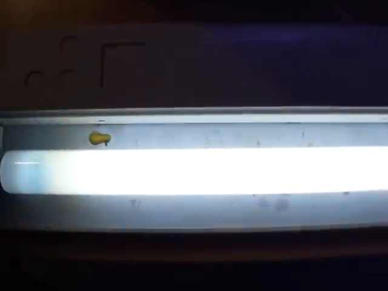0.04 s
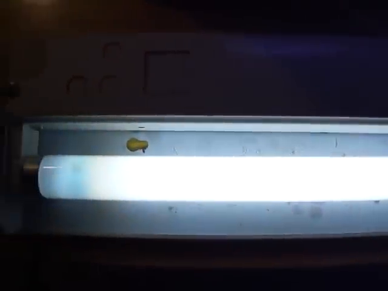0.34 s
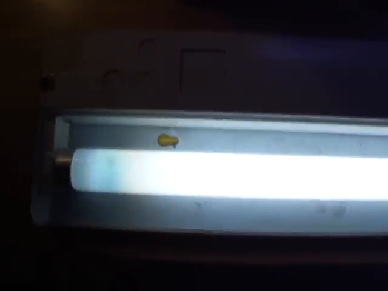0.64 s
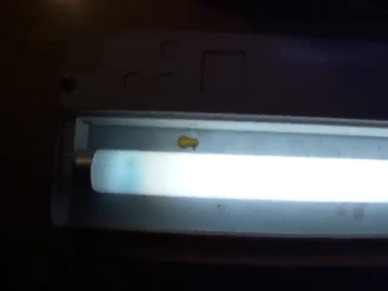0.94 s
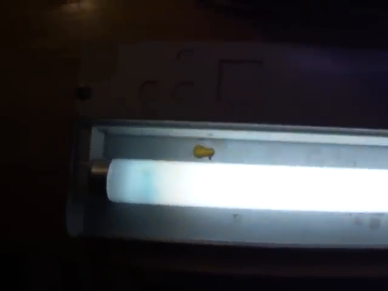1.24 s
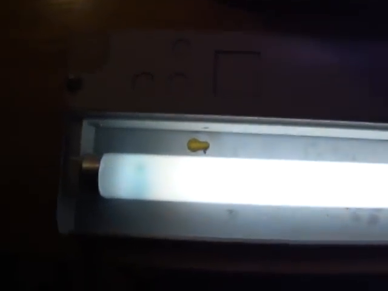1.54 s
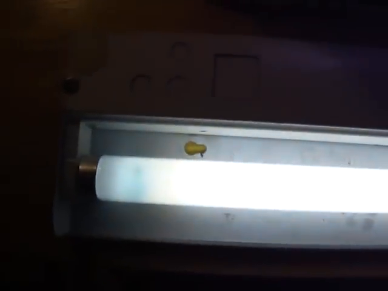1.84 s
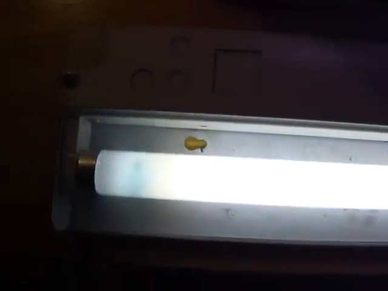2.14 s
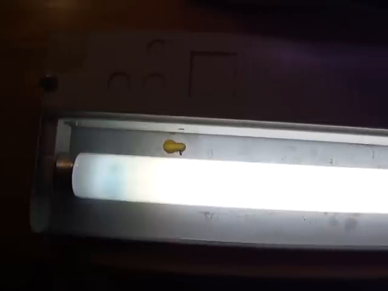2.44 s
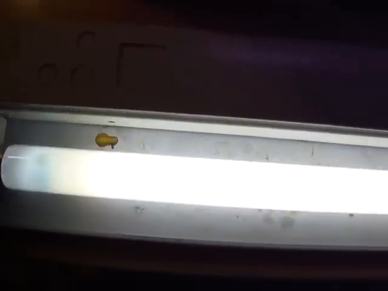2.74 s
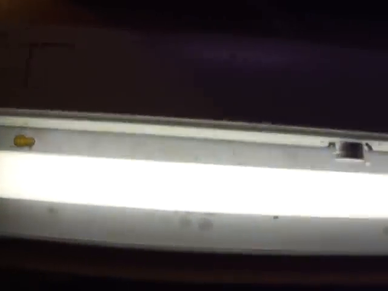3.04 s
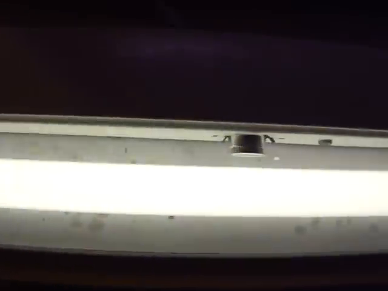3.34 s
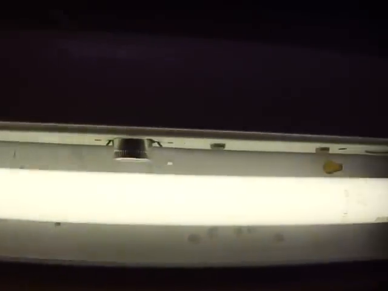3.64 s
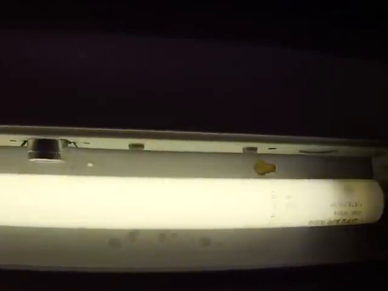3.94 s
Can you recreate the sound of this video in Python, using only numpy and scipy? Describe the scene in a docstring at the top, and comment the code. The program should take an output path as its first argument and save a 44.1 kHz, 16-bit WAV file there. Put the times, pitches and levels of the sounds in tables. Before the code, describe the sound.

A fluorescent tube buzzes and hums steadily up close, with a thin high whine.

```python
"""A fluorescent tube hums and buzzes on 60 Hz mains, close to a hand-held microphone in a quiet room.
The ballast hums and, each mains cycle, shakes the fixture into the same bursts of whine, whistle
and sizzle. The microphone moves to one end, rests, then slides along the tube, so the fixture's
rings fade and swell in turn."""
import sys
import numpy as np
from scipy import signal
from scipy.fft import rfft, irfft
from scipy.io import wavfile

SR = 44100
rng = np.random.default_rng(int(sys.argv[2]) if len(sys.argv) > 2 else 0)


def generate_wav(signal):
    """Clip the signal to [-1, 1] and save it as 16-bit WAV at the path in sys.argv[1]."""
    frames = np.transpose(np.atleast_2d(signal))
    scaled = np.clip(frames, -1, 1) * 32767
    pcm = np.round(scaled).astype(np.int16)
    wavfile.write(sys.argv[1], SR, pcm)


N = 176400
MAINS_HZ, CYCLE_SIZE = 60, 4096
HARMONIC_HZ = np.arange(CYCLE_SIZE) * MAINS_HZ
CYCLE_TURNS = np.arange(CYCLE_SIZE) / CYCLE_SIZE
BIN_HZ = np.fft.rfftfreq(N, 1 / SR)

# mains drift (time [s], frequency [Hz])
MAINS_TRACK_HZ = [(0, 59.98), (.8, 59.98), (2.2, 59.991), (3, 60.006), (4, 59.991)]
# microphone path (time [s], slide [0 = tube end, 1 = further along])
MIC_SLIDE = [(0, 0.36), (.6, 0), (2.6, 0), (3.2, 0.39), (3.65, 0.67), (4, 0.72)]
# room noise (frequency [Hz], density [dB/Hz])
ROOM_SPECTRUM = [(20, -110), (50, -106), (80, -99), (110, -100), (150, -95), (210, -91), (300, -86.5),
                 (450, -86.5), (550, -81), (630, -85), (690, -80.5), (790, -85.5), (870, -80), (980, -84),
                 (1100, -82), (1170, -84), (1320, -84), (1450, -84.5), (1650, -88.5), (2500, -88.5),
                 (3000, -93.5), (3900, -98), (4300, -93), (5000, -99.5), (7000, -100), (9000, -101.5),
                 (10900, -100)]
# change in room noise at slide 1 (frequency [Hz], gain [dB])
ROOM_ALONG_EQ = [(100, -2), (550, 3.5), (900, -4.5), (1300, -4.5), (2000, -1), (3300, -3.5), (10000, 7)]
# ballast hum at slide 0 and 1 (harmonic [x mains], relative level [dB])
HUM_END_HARMONICS = [(1, -26), (2, -18), (3, -10.5), (4, -12), (5, -10), (6, -5.5), (7, -13.5), (8, -3.5),
                     (9, -14.5), (10, -10), (11, -19.5), (12, -18), (13, -22.5), (14, -18), (15, -12),
                     (16, -7.5), (17, -10.5), (18, -5), (19, -5), (20, 1), (21, -24), (22, -16.5),
                     (23, -9.5), (24, -17)]
HUM_ALONG_HARMONICS = [(1, -21.5), (2, -28), (3, -21), (4, -3.5), (5, -14), (6, -5), (7, 2.5), (8, -2.5),
                       (9, -14), (10, -1), (11, -7), (12, -16), (13, -11), (14, -5), (15, -12), (16, -25),
                       (17, -9), (18, -5), (19, 3), (20, 1), (21, -26), (22, -18), (23, -18), (24, -6)]
# partials of the fixture's rings (frequency [Hz], relative level [dB])
RATTLE_PARTIALS = [(2880, -22), (3120, -8.5), (3240, -19), (3360, -3.5), (3420, -22), (3480, -9),
                   (3540, -18), (3600, -8.5), (3660, -12), (3720, -10), (3780, -3), (3840, -10), (3900, -6),
                   (3960, -5), (4020, -11.5)]
FIZZ_PARTIALS = [(4900, -15.5), (5400, -13), (6360, -14.5), (6480, -4), (6600, -15), (7080, -14),
                 (7200, -1), (7320, -19.5), (7440, 6.5), (7560, -7.5), (7680, 0.5), (7800, -4), (7920, -6),
                 (8160, -10.5)]
SIZZLE_PARTIALS = [(9060, -10), (9120, -16), (9180, -10), (9240, -3), (9300, 1.5), (9360, -11.5),
                   (9420, 1.5), (9480, -2), (9540, -4.5), (9600, -11), (9660, -19.5)]
SPIT_PARTIALS = [(9720, -13), (9840, -12), (9960, -6.5), (10200, -0.5), (10320, -27), (10440, -9),
                 (10500, -10), (10560, -0.5), (10680, -17), (10800, 3.5), (10860, -2.5), (10980, -3.5)]
WHISTLE_END_PARTIALS = [(8160, -25), (8280, -13), (8400, -0.5), (8460, -6.5), (8520, -2), (8580, 0),
                        (8640, 1), (8700, -6), (8760, -12), (8880, -25), (8940, -24)]
WHISTLE_ALONG_PARTIALS = [(8160, -26), (8340, -24), (8460, -9), (8520, -15.5), (8580, 0), (8640, -3),
                          (8700, -3), (8760, -11), (8820, -14), (8880, -10), (8940, -13)]
WHINE_PARTIALS = [(4080, -63.5), (4140, -58), (4200, -68), (4260, -53), (4320, -58.5), (4380, -55),
                  (4440, -59.5), (4500, -63.5), (4560, -87), (4620, -62), (4680, -63.5), (4740, -65),
                  (4800, -64.5), (4860, -81.5)]
# bursts in one mains cycle (centre [cycles], width [cycles], relative level [dB])
HUM_BURSTS = [(0.082, 0.128, 2), (0.359, 0.101, -1), (0.748, 0.182, -1)]
RATTLE_BURSTS = [(0.219, 0.147, -2), (0.742, 0.15, 0)]
FIZZ_BURSTS = [(.26, 0.2, 0.081), (0.742, 0.17, -1.09)]
SIZZLE_BURSTS = [(0.36, 0.055, -2), (0.14, 0.15, 1), (0.73, 0.14, -6.5)]
WHISTLE_BURSTS = [(.13, 0.087, -12.5), (.64, .13, -1.5)]
WHINE_BURSTS = [(.14, 0.085, 0), (.31, 0.075, -6), (0.599, 0.133, -0.5), (.88, 0.095, -8.5)]
# rings at the microphone, before any trim (time [s], level [dB])
RATTLE_DB = [(0, -62.5), (2.7, -62), (3.15, -58.5), (3.4, -59), (3.7, -56), (4, -55)]
FIZZ_DB = [(0, -62.5), (.7, -62.5), (2.2, -61), (2.85, -64), (3.2, -61.5), (3.7, -61), (4, -64)]
SIZZLE_DB = [(0.0, -56), (0.7, -63), (1.73, -56), (2.38, -57), (2.74, -65), (2.92, -54.5), (3.07, -56),
             (3.24, -64), (3.59, -62), (3.68, -74), (3.91, -63), (4.0, -65)]
SPIT_DB = [(0, -58.5), (.37, -57.5), (2, -56), (2.7, -56), (3.05, -58.5), (3.2, -56.5), (3.34, -63),
           (3.55, -60.5), (3.68, -60), (3.85, -55), (4, -57)]
WHISTLE_DB = [(0, -54.5), (.23, -56), (.47, -63), (.71, -55), (1.3, -57), (2.12, -59), (2.66, -54),
              (2.84, -61), (3.03, -51.5), (3.17, -59.5), (3.31, -50.5), (3.42, -52), (3.56, -46),
              (3.87, -43.5), (4, -43.7)]
WHINE_LOW_DB = [(0.0, -51), (0.7, -51.5), (1.97, -50.5), (2.6, -51.5), (3.13, -52), (3.74, -53), (4.0, -55)]
WHINE_MID_DB = [(0.0, -48), (0.38, -49), (0.75, -52), (2.41, -54), (3.14, -46.5), (3.62, -49.5),
                (3.91, -58.5), (4.0, -65)]
WHINE_TOP_DB = [(0.0, -67), (0.79, -61), (2.61, -60), (3.03, -65.5), (3.66, -58), (4.0, -56)]


def amp(db):
    """dB to gain."""
    return 10 ** (np.asarray(db) / 20)


def unit_rms(x):
    """Scale to rms 1."""
    return x / np.sqrt(np.mean(abs(x) ** 2) + 1e-20)


def curve(points):
    """(time [s], value) points to one value per sample."""
    return np.interp(np.arange(N) / SR, *np.transpose(points))


def gain_at(spectrum, freq):
    """Gain from (frequency, level [dB]) points, log frequency axis."""
    point_freq, db = np.transpose(sorted(spectrum))
    return amp(np.interp(np.log(freq + 1), np.log(point_freq + 1), db))


def equalise(x, spectrum):
    """Filter by (frequency [Hz], gain [dB]) points."""
    return irfft(rfft(x) * gain_at(spectrum, BIN_HZ), N)


def drift(rate_hz):
    """Low-passed noise, rms 1."""
    return unit_rms(irfft(rfft(rng.standard_normal(N)) * np.exp(-(BIN_HZ / rate_hz) ** 2), N))


def burst_envelope(bursts, turns):
    """Shaking strength over the mains cycle: Gaussian bursts."""
    return sum(amp(db) * np.exp(-(((turns - centre + .5) % 1 - .5) / width) ** 2)
               for centre, width, db in bursts)


def burst_partials(spectrum, bursts, passes=40):
    """Mains harmonics; each pass draws their random phases toward the bursts."""
    edges_hz = np.transpose(spectrum)[0]
    low_hz, high_hz = edges_hz.min() - MAINS_HZ / 2, edges_hz.max() + MAINS_HZ / 2
    gains = gain_at(spectrum, HARMONIC_HZ) * (HARMONIC_HZ > low_hz) * (HARMONIC_HZ < high_hz)
    envelope = burst_envelope(bursts, CYCLE_TURNS)
    partials = gains * np.exp(2j * np.pi * rng.random(CYCLE_SIZE))
    for _ in range(passes):
        bunched = np.fft.fft(envelope * np.exp(1j * np.angle(np.fft.ifft(partials))))
        partials = gains * np.exp(1j * np.angle(bunched))
    return partials


def with_gains(partials, gains):
    """Same phases, new magnitudes."""
    return partials / (abs(partials) + 1e-12) * gains


def loop_cycle(partials, turns):
    """One cycle looped on the mains clock; complex, real part rms 1."""
    looped = np.interp(turns % 1, CYCLE_TURNS, np.fft.ifft(partials), period=1)
    return unit_rms(looped) * np.sqrt(2)


def room(slide, flutter_db=0.75):
    """Airy room noise; its colour shifts as the microphone moves."""
    air = equalise(rng.standard_normal(N) * np.sqrt(SR / 2), ROOM_SPECTRUM)
    blend = (1 - slide) * air + slide * equalise(air, ROOM_ALONG_EQ)
    return blend * amp(flutter_db * drift(rate_hz=18))


def ballast_hum(turns, slide, split_hz=750, end_db=-51, along_db=-49):
    """Smooth low hum plus pulsing nasal buzz; the balance changes along the tube."""
    lines = [(k * MAINS_HZ, db) for k, db in HUM_END_HARMONICS]
    smooth = burst_partials([(hz, db) for hz, db in lines if hz < split_hz], [(0, 10, 0)])  # flat
    pulsing = burst_partials([(hz, db) for hz, db in lines if hz > split_hz], HUM_BURSTS)
    end = smooth + pulsing
    along = with_gains(end, gain_at(HUM_ALONG_HARMONICS, np.arange(CYCLE_SIZE)))
    return ((1 - slide) * amp(end_db) * loop_cycle(end, turns).real
            + slide * amp(along_db) * loop_cycle(along, turns).real)


def fixture_ring(spectrum, bursts, turns, slide, hiss_gain, echo_db=3.5, echo_turns_per_slide=1.1):
    """Bursts, pulsed hiss and a housing reflection that grows and turns in phase with slide."""
    partials = burst_partials(spectrum, bursts)
    smeared = loop_cycle(burst_partials(spectrum, bursts, passes=1), turns)
    echo = amp(echo_db) * slide * smeared * np.exp(2j * np.pi * echo_turns_per_slide * slide)
    band = np.interp(BIN_HZ, HARMONIC_HZ, abs(partials))
    pulsed_noise = rng.standard_normal(N) * burst_envelope(bursts, turns)
    hiss = unit_rms(irfft(rfft(pulsed_noise) * band, N))
    return unit_rms((loop_cycle(partials, turns) + echo).real + hiss_gain * hiss)


def fixture_buzz(turns, slide, sizzle_trim_db=-0.1, spit_trim_db=-0.14):
    """Four rough rings, from a rattle near 3.8 kHz to a thin spit above 10 kHz."""
    rattle = fixture_ring(RATTLE_PARTIALS, RATTLE_BURSTS, turns, slide, hiss_gain=0.047)
    fizz = fixture_ring(FIZZ_PARTIALS, FIZZ_BURSTS, turns, slide, hiss_gain=0.15)
    sizzle = fixture_ring(SIZZLE_PARTIALS, SIZZLE_BURSTS, turns, slide, hiss_gain=0.14)
    spit = fixture_ring(SPIT_PARTIALS, SIZZLE_BURSTS, turns, slide, hiss_gain=0.09)
    return (amp(curve(RATTLE_DB)) * rattle
            + amp(curve(FIZZ_DB)) * fizz
            + amp(curve(SIZZLE_DB) + sizzle_trim_db) * sizzle
            + amp(curve(SPIT_DB) + spit_trim_db) * spit)


def fixture_whistle(turns, slide, trim_db=0.47, flutter_db=0.2):
    """Clean 8.6 kHz ring, one strong burst per cycle; louder and purer along the tube."""
    along = burst_partials(WHISTLE_ALONG_PARTIALS, WHISTLE_BURSTS)
    end = with_gains(along, gain_at(WHISTLE_END_PARTIALS, HARMONIC_HZ))
    gain = amp(curve(WHISTLE_DB) + trim_db + flutter_db * drift(rate_hz=26))
    return gain * ((1 - slide) * loop_cycle(end, turns) + slide * loop_cycle(along, turns)).real


def fixture_whine(turns, splits_hz=(4350, 4530), trim_db=-1.5):
    """Strong ring near 4.3 kHz; its low, mid and top partials carry to different places."""
    partials = burst_partials(WHINE_PARTIALS, WHINE_BURSTS)
    band = np.digitize(HARMONIC_HZ, splits_hz)
    return sum(amp(curve(level_db) + trim_db) * loop_cycle(partials * (band == k), turns).real
               for k, level_db in enumerate([WHINE_LOW_DB, WHINE_MID_DB, WHINE_TOP_DB]))


def scene():
    """Ballast and fixture on one mains clock, over the room; mono."""
    turns = np.cumsum(curve(MAINS_TRACK_HZ)) / SR  # elapsed mains cycles
    slide = curve(MIC_SLIDE)
    tube = (ballast_hum(turns, slide) + fixture_whine(turns)
            + fixture_whistle(turns, slide) + fixture_buzz(turns, slide))
    return (tube + room(slide))[None]


def record(dry):
    """Steep low-pass."""
    cutoff_hz = 11000
    taps = signal.firwin(1023, cutoff_hz, window=("kaiser", 9), fs=SR)
    return signal.oaconvolve(dry, taps[None], "same")


dry = scene()
out = record(dry)
generate_wav(out)
```